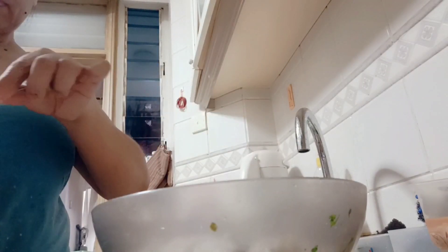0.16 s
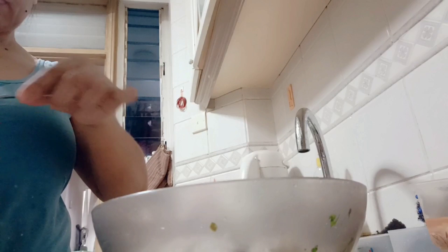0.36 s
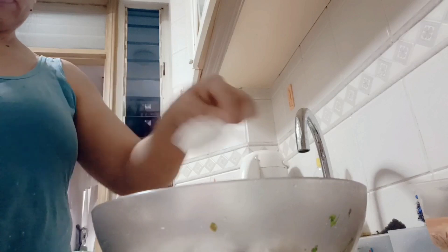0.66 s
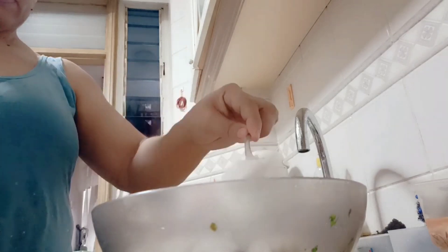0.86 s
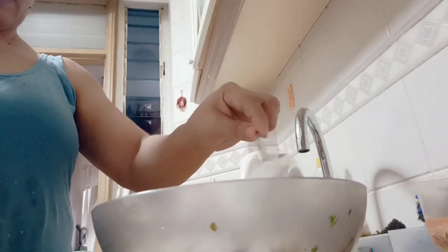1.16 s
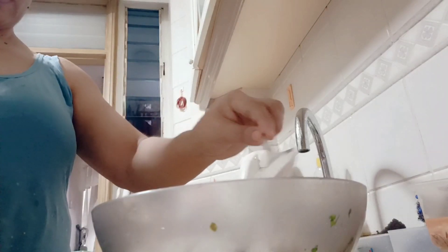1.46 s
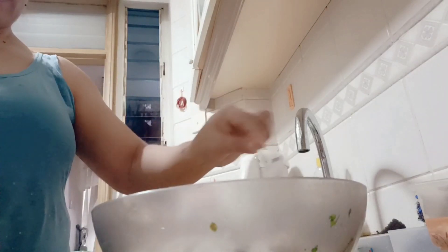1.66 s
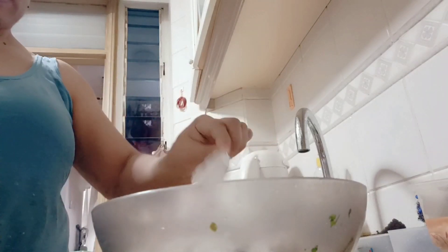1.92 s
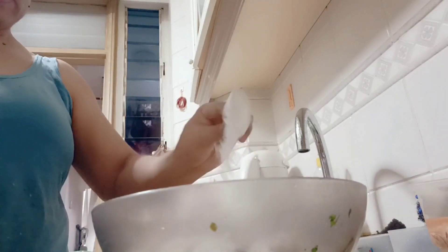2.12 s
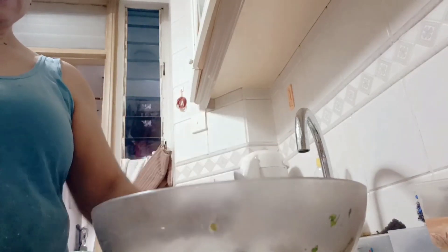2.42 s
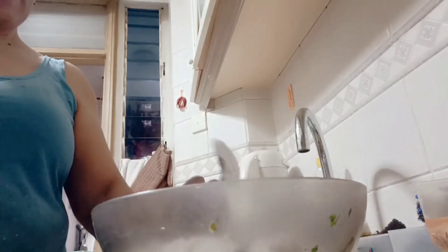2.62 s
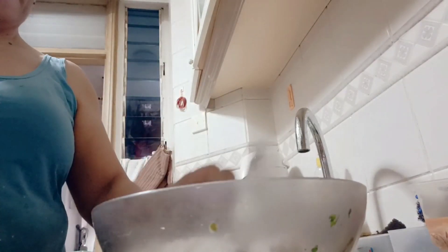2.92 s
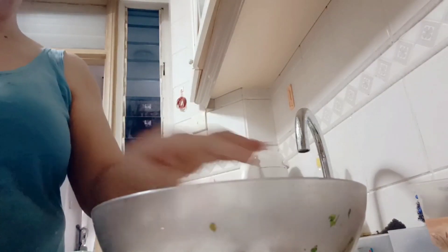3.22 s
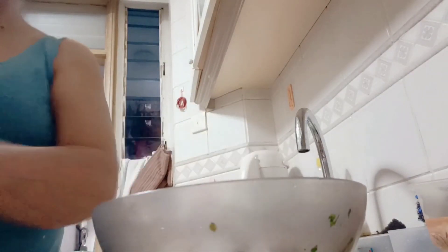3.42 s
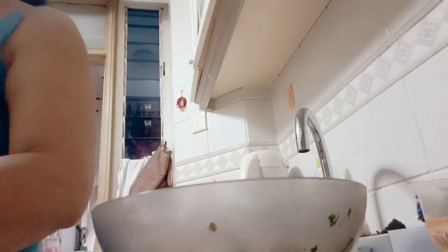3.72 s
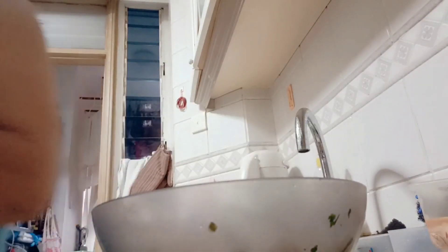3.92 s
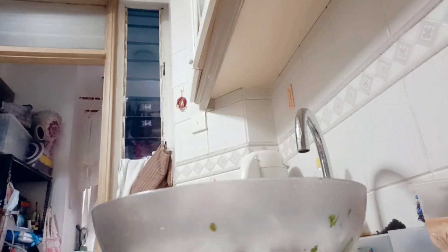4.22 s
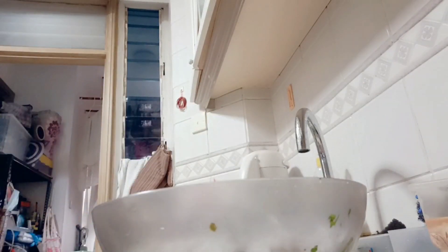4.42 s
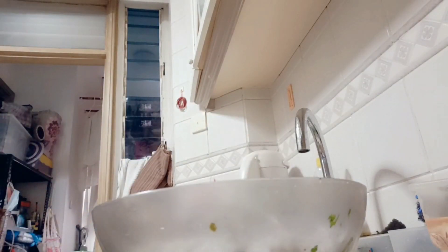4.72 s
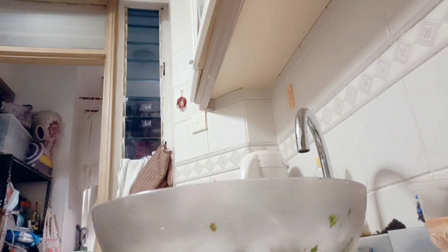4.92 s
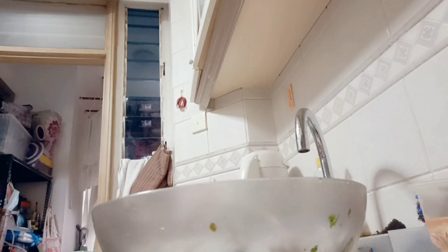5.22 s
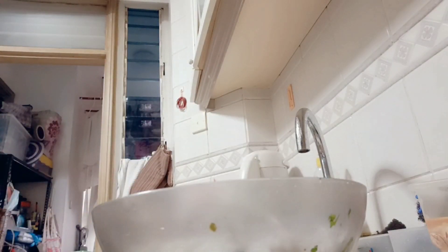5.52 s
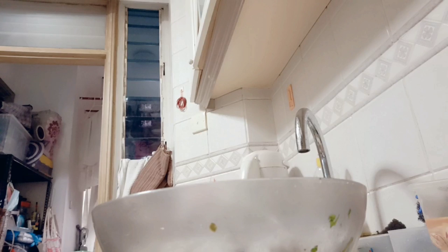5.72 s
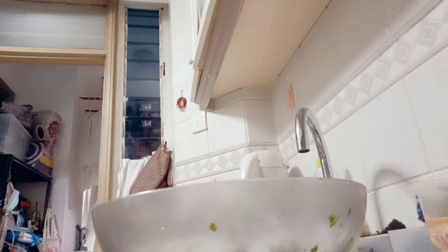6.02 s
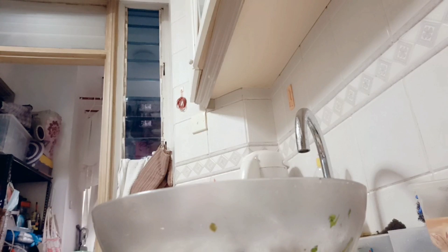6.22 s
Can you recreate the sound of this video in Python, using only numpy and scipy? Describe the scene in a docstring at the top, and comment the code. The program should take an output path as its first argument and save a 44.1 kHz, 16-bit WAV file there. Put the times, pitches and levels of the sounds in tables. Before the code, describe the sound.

In a small tiled kitchen with a faint hum, a plastic scoop knocks sharply, small snaps and bumps follow, then a metal pot clatters down.

```python
"""Two microphones in a small tiled kitchen; a quiet appliance hums under room air throughout.
After the faint dying tail of an earlier knock, a plastic scoop is knocked clean on a container and
put down. Snaps, thumps, bumps, rustles and a nudged tub follow; a metal pot is set down, rings and
rocks to rest; one soft rustle closes. Contacts are coloured pulses with scatter and reflections;
rings are sums of dying modes; rustles and air are shaped noise; the hum is wavering sines."""
import sys
import numpy as np
from scipy import signal
from scipy.fft import rfft, irfft
from scipy.io import wavfile

SR = 44100
rng = np.random.default_rng(int(sys.argv[2]) if len(sys.argv) > 2 else 0)


def materialize(psi):
    """Save the field psi as 16-bit PCM at rate SR to the path in sys.argv[1].

    A 1-D psi becomes a single channel; in a 2-D psi each row is a channel.
    """
    bounded = np.clip(np.atleast_2d(psi).T, -1, 1)
    quanta = np.round(bounded * 32767).astype(np.int16)
    wavfile.write(sys.argv[1], SR, quanta)


N = 280294  # samples
SIZE = 32768  # samples per contact buffer
AGE_S = np.arange(SIZE) / SR
FREQS_HZ = np.fft.rfftfreq(SIZE, 1 / SR)
ATTACK = 1323  # samples (30 ms)
EDGE_HZ = 15700

# Levels in the tables are relative; each source adds its own trim.
# Room air spectrum: (frequency [Hz], relative density [dB per Hz])
AIR_SPECTRUM = [(25, -13.5), (90, 1.5), (170, -12.5), (500, -11), (800, -15.5), (1300, -20), (3200, -25.5),
                (4100, -29), (5100, -37), (6400, -33), (7900, -27), (10000, -31.5), (13000, -33.5),
                (15000, -32)]
# Appliance hum before microphone gains: (frequency [Hz], mean level [dB])
HUM_TONES = [(91.5, -73.5), (242, -74), (301, -79), (355, -74.5), (710, -65), (790, -71.5), (1065, -69),
             (1421, -78.5), (1776, -79)]
# Likeness of the two microphones: (frequency [Hz], coherence [-1 to 1])
MIC_COHERENCE = [(100, 0.96), (300, 0.75), (600, 0.62), (1300, -0.41), (2500, 0.063), (15000, -0.067)]
# Tile reverberation: (frequency [Hz], t60 [s])
ROOM_DECAY = [(120, 0.42), (320, 0.25), (840, 0.23), (2000, 0.25), (3500, 0.24), (7000, 0.28),
              (14000, 0.25)]
# Sliding strokes: (start [s], swell [s], level [dB])
SLIDES = [(3.55, 0.085, -48.5), (3.69, 0.048, -58.5), (4.153, 0.019, -47.5), (4.2, 0.016, -44.5),
          (4.29, 0.095, -49.5), (4.546, 0.025, -49.5), (6.15, 0.11, -59.5)]
# Things brushed in passing; the first row is an earlier knock dying away:
# (time [s], level [dB], brightness [dB/octave], hollowness [dB], direct over scattered [dB])
BUMPS = [(0.001, -50, 4.5, -2, -12), (3.568, -43, -7, -8, -18), (3.9892, -30.5, 2.5, 6.5, 2),
         (4.002, -30.5, 1.5, 7.5, -1.5), (4.0155, -37.5, -1, -2, 0), (4.158, -48, 0.5, -9, -7)]
# Small snaps and the dull thumps that follow two of them:
# (time [s], level [dB], brightness [dB/octave], hollowness [dB], direct over scattered [dB])
SNAPS = [(3.4619, -42.5, 8, 2.5, 11), (3.616, -33.5, 3, -3, 22), (3.6197, -21.2, -3.5, 3.5, -2.5),
         (4.208, -41.5, -0.5, -24, 4), (4.2129, -33, -1.5, -6, -3.5), (5.083, -57.5, 0.8, -7, -5)]
# Hollow tub nudged: (time [s], level [dB], brightness [dB/octave])
NUDGES = [(3.9903, -25.5, 7.5), (4.003, -30, 6.5), (4.016, -16.5, -2.5), (4.108, -40, 1)]
# Pot contacts:
# (time [s], level [dB], brightness [dB/octave], hollowness [dB], base ring [dB])
POT_CONTACTS = [(5.3211, -17, 3.3, 12.5, -21.5), (5.339, -20.5, 3, -16, -36), (5.4128, -15.5, -.3, -8, -16),
                (5.434, -19, 1, -13, -35), (5.474, -19.5, 0.7, -0.5, -41), (5.5752, -12, -.7, 9, -16),
                (5.598, -37, 9, -9, -26.5), (5.633, -15.5, -3, 11, -20), (5.745, -27.5, -0.2, -2, -30.5),
                (5.779, -16, -1.6, 5.5, -29), (5.812, -30.5, -4.5, 10, -37)]
# Scoop knocks: (time [s], level [dB], brightness [dB/octave], hollowness [dB],
# direct over scattered [dB], wall stiffness [frequency ratio])
KNOCKS = [(2.3458, -14, 0.3, -5.5, -6.5, 1.066), (2.5353, -16, -1, -9, -2.5, 0.99),
          (2.6702, -15, 0, -10.5, -6.5, 1.02), (2.7126, -14.5, 5.74, 25, 2, 1.08),
          (2.8003, -19.5, -1, -6.5, -.5, 0.96), (3.0436, -19, 0.2, 0.5, -13.5, 1.05),
          (3.0915, -20, -1.5, 29, 1, 1.2), (3.1085, -22.2, 0.4, 2, -5, 1.1)]
# Bands of thud, body, clack, crack, tick: (low [Hz], high [Hz])
BANDS = [(100, 350), (350, 800), (800, 2000), (2000, 4300), (5000, 15000)]
# Ordinary blow by band: (thud [dB], body [dB], clack [dB], crack [dB], tick [dB])
BUMP_BLOW = (-14.5, -1, -1.5, -9.5, -16)
SNAP_BLOW = (-3.5, -4.5, -14.5, -13, -8)
POT_BLOW = (-7.5, 0, -2, -1.5, -20.5)
SCOOP_BLOW = (-13.5, 0, 1.5, -4.5, -22)
# Contact colour: (frequency [Hz], gain [dB])
BUMP_COLOUR = [(40, -17), (90, 1.5), (250, 3.5), (600, -9.5), (1000, -14), (2000, -8.5), (2900, 2),
               (4800, -22.5), (7500, -12), (11500, -34.5), (15000, -21)]
SNAP_COLOUR = [(40, -22), (90, -3.5), (150, -1), (230, 5.5), (330, 4.5), (480, -1.5), (680, -11.5),
               (1000, -13), (3000, -12), (5500, -12), (7400, 0), (8800, -14.5), (12000, -22.5),
               (15000, -13)]
POT_COLOUR = [(40, -35), (90, -7.5), (160, -7.5), (220, -6.5), (290, -6.5), (450, 6), (700, -1), (1600, -1),
              (2500, -14), (3800, -13.5), (5000, -30), (6500, -23.5), (9500, -25.5), (12500, -35)]
SCOOP_COLOUR = [(40, -46.5), (90, -12), (140, -5), (200, -7), (300, -2.5), (600, -10.5), (850, -3),
                (1200, -1.5), (1700, -1.5), (3100, 0.5), (3900, -9), (4700, -24), (7600, -18), (14500, -29)]
# Modes before detuning and damping: (frequency [Hz], level [dB], t60 [s])
TUB_MODES = [(489, 3.5, 0.18), (532, -8.5, 0.2), (613, -8, 0.12), (692, -7.5, 0.093), (1510, -14.5, 0.052),
             (2863, -25, 0.093)]
RIM_MODES = [(372, -5.5, 0.29), (408, -4, 0.27), (1264, 2, 0.14), (1474, -3.5, 0.12), (1535, -1.5, 0.049),
             (1860, -8, 0.32), (3290, -4.5, 0.16), (3957, -5.5, 0.11), (4200, -12.5, 0.26),
             (5905, -6.5, 0.1), (6544, -10.5, 0.142), (8170, -22, .17), (8560, -17, 0.16),
             (9300, -17.5, .13), (9900, -20, 0.22), (11060, -23, 0.35), (13860, -21.5, .2)]
BASE_MODES = [(218.6, -2, 0.21), (386.7, 4.5, 0.16), (470, 0, 0.24), (538.5, 2.5, 0.13), (570.8, 1, 0.32),
              (817, -11.5, 0.22), (1027, -6.5, 0.18), (1280, -7.5, 0.26), (1550, -19.5, 0.12),
              (1845, -2, .16), (2970, -18.5, 0.14), (3150, -10, 0.21), (3350, -16, 0.16), (4000, -12, 0.28),
              (6600, -21, 0.18), (8560, -21.5, 0.24), (10648, -31, 0.19)]
SCOOP_MODES = [(296, 0, 0.15), (582, 6, 0.081), (844, -2, 0.15), (1490, -3, 0.24), (1660, -4, .24),
               (1965, -9.5, 0.071), (2450, -6, 0.095), (2980, -2, 0.18), (3290, -27, 0.38)]

AIR_LEVEL_DB = -58.3
HUM_DRIFT_DB, HUM_LEAD_S = 2.1, 0.0002  # drift: standard deviation; lead: right mic over left
SLIDE_T60_S = 0.33
# Mid-wall blows sound hollow: centre and width of the emphasis
PLASTIC_HOLLOW_HZ, POT_HOLLOW_HZ, HOLLOW_OCTAVES = 550, 1070, 0.72
# Mode shift per contact (standard deviation, share of pitch); thin walls radiate little below this
DETUNE_RATIO, RADIATE_HZ = 0.003, 110
# Hand damps the tub: onset, added decay
GRIP_S, GRIP_T60_S = 0.063, 0.08
# Rim sings less as the pot settles flat
RIM_FIRST_DB, SETTLE_DB_PER_S = 2.5, 79
# Scoop moves left, mostly heard in the treble: limiting speed, half-effect frequency
DRIFT_DB_PER_S, SHADOW_HZ = 5, 900


def amp(db):
    """Amplitude from dB."""
    return 10 ** (np.asarray(db) / 20)


def rms(x):
    """Root mean square, kept above zero."""
    return np.sqrt(np.mean(x ** 2) + 1e-20)


def read(points, hz):
    """Straight lines between points on a log-frequency axis."""
    point_hz, value = np.transpose(points)
    return np.interp(np.log(hz + 1), np.log(point_hz + 1), value)


def fade(t, t60_s):
    """Falls by 60 dB in t60_s."""
    return np.exp(-np.log(1000) * t / np.maximum(t60_s, 1e-3))


def add(mix, start_s, sound):
    """Mix a sound in at its start, cut at the end of the mix."""
    part = mix[:, round(start_s * SR):][:, :sound.shape[1]]
    part += sound[:, :part.shape[1]]


def causal(db):
    """Minimum-phase response for a gain curve in dB."""
    cepstrum = irfft(np.log(amp(db)))
    cepstrum[1:SIZE // 2] *= 2
    cepstrum[SIZE // 2 + 1:] = 0
    return np.exp(rfft(cepstrum))


def diffuse(size):
    """Two-microphone noise spectra with the set coherence."""
    a, b = rfft(rng.standard_normal((2, size)))
    coherence = read(MIC_COHERENCE, np.fft.rfftfreq(size, 1 / SR))
    turn = np.arccos(np.clip(coherence, -1, 1)) / 2
    common, opposed = np.cos(turn) * a, np.sin(turn) * b
    return np.array([common + opposed, common - opposed])


def balance(hz, lean):
    """Gains of both microphones from points (frequency [Hz], left minus right [dB])."""
    return amp(np.array([[.5], [-.5]]) * read(lean, hz))


def grain(size, spread_db):
    """Uneven strength, redrawn about every millisecond."""
    draws = rng.standard_normal(size // 48 + 1)
    return amp(spread_db * np.repeat(draws, 48)[:size])


def overtones(count, low_hz, high_hz, width_hz, height_db):
    """Gain curve in dB of the many small, irregular resonances of a thin wall."""
    place, size = rng.random((count, 2)).T
    hz = low_hz + (high_hz - low_hz) * (np.arange(count) + place) / count
    height = amp(height_db * size)[:, None] ** 2
    peaks = height / (1 + (2 * (FREQS_HZ - hz[:, None]) / width_hz) ** 2)
    return 10 * np.log10(1 + peaks.sum(0))


def room_tail():
    """Dense tile reflections, each band dying at its own speed."""
    hz, frame_s, z = signal.stft(irfft(diffuse(SIZE)), SR, nperseg=256)
    decay = fade(frame_s, read(ROOM_DECAY, hz)[:, None])
    tail = signal.istft(z * decay, SR, nperseg=256)[1][:, :SIZE]
    tail = tail * (1 - np.exp(-AGE_S / 0.0079))
    return tail / np.linalg.norm(tail[0])


def blow(ordinary_db, hollow_hz, level_db, bright_db, hollow_db):
    """Band levels of a blow: hard contact tilts to the treble, a central one swells the middle."""
    octaves = np.log2(np.sqrt(np.prod(BANDS, axis=1)) / hollow_hz)
    hollow = np.exp(-.5 * (octaves / HOLLOW_OCTAVES) ** 2)
    db = np.array(ordinary_db) + bright_db * octaves + hollow_db * hollow
    return level_db + db - 20 * np.log10(np.linalg.norm(amp(db)))


def contact(levels_db, colour_db, direct_db, scatter_t60_s, room_db, left_lag_ms, lean):
    """One blow: a sharp pulse, the short shudder of object and counter, and the room."""
    delay_ms = np.array([[.5], [-.5]]) * left_lag_ms + .5
    pulse = np.exp(-2j * np.pi * FREQS_HZ * delay_ms / 1000)
    shudder = irfft(diffuse(SIZE)) * fade(AGE_S, scatter_t60_s)
    shudder *= grain(SIZE, spread_db=2.5) * (1 - np.exp(-AGE_S / 0.0013))
    scattered = shudder / np.linalg.norm(shudder[0]) + amp(room_db) * room_tail()
    z = amp(direct_db) * pulse + rfft(scattered)
    z = z * causal(colour_db) * balance(FREQS_HZ, lean)
    # steer each band towards its level over the attack
    plain = [rms(irfft(z * (FREQS_HZ > lo) * (FREQS_HZ < hi))[:, :ATTACK]) for lo, hi in BANDS]
    gain_db = np.array(levels_db) - 20 * np.log10(plain)
    tone = np.c_[np.sqrt(np.prod(BANDS, axis=1)), gain_db]
    return irfft(z * causal(read(tone, FREQS_HZ)))[:, :SIZE * 3 // 4]


def ring(modes, wet_db, lean):
    """Dying modes, shared a little differently by each blow; reflections make them beat."""
    hz, db, t60_s = np.transpose(modes)
    phase, luck_db, shift = rng.standard_normal((len(hz), 3)).T
    hz = hz * (1 + DETUNE_RATIO * shift)
    apart = np.arccos(np.clip(read(MIC_COHERENCE, hz), -1, 1)) / 2
    t = AGE_S[:SIZE // 2]
    angle = 2 * np.pi * phase + np.array([-apart, apart])
    weights = amp(db + luck_db) * balance(hz, lean) * np.exp(1j * angle)
    waves = np.exp(2j * np.pi * hz[:, None] * t) * fade(t, t60_s[:, None])
    dry = (weights @ waves).real * (1 - np.exp(-t / 0.00088))
    highpass = signal.butter(2, RADIATE_HZ, "highpass", fs=SR, output="sos")
    dry = signal.sosfilt(highpass, dry)
    wet = signal.fftconvolve(dry, room_tail(), axes=1)[:, :len(t)]
    return dry + amp(wet_db) * wet


def room_air():
    """Steady air noise shaped by its spectrum."""
    hz = np.fft.rfftfreq(N, 1 / SR)
    lean = [(100, 0.0), (1000, -0.5), (10000, -4.5)]
    air = irfft(diffuse(N) * amp(read(AIR_SPECTRUM, hz)) * balance(hz, lean), N)
    return amp(AIR_LEVEL_DB) * air / rms(air)


def appliance_hum():
    """Motor tones whose phase wavers and whose level swells and sinks slowly."""
    t, out = np.arange(N) / SR, np.zeros((2, N))
    waver_s, drift_s = np.linspace(0, N / SR, 70), np.linspace(0, N / SR, 10)
    mic_db, lead_s = np.array([[1.5], [3.5]]), np.array([[0], [HUM_LEAD_S]])
    for tone_hz, db in HUM_TONES:
        waver_rad = 0.57 * np.interp(t, waver_s, rng.standard_normal(70))
        drift_db = HUM_DRIFT_DB * np.interp(t, drift_s, rng.standard_normal(10))
        wave = np.sin(2 * np.pi * tone_hz * (t + lead_s) + waver_rad)
        out += amp(db + drift_db + mic_db) * wave
    return out


def stroke(t, swell_s):
    """Pressure of one slide: a smooth swell, then a steady fade."""
    swell = np.sin(np.pi / 2 * np.clip(t / swell_s, 0, 1)) ** 2
    return swell * fade(np.maximum(t - swell_s, 0), SLIDE_T60_S)


def rustle():
    """Sliding surfaces catch and slip in many tiny grains."""
    hz, t = np.fft.rfftfreq(N, 1 / SR), np.arange(N) / SR
    colour = [(40, -6), (200, 6.0), (500, 9), (1200, 3.5), (3000, 0), (5000, -9.0),
              (7800, -2), (11500, -9.5), (15000, -12)]
    lean = [(200, 2.0), (8000, -1.5)]
    hiss = irfft(diffuse(N) * amp(read(colour, hz)) * balance(hz, lean), N)
    grainy = hiss * grain(N, spread_db=1.5)
    pressure = sum(amp(db) * stroke(t - s, swell_s) for s, swell_s, db in SLIDES)
    return pressure * grainy / rms(grainy)


def bumps():
    """Earlier knock's tail, then brushed objects, on the right: coloured contacts, no modal ring."""
    out, lean = np.zeros((2, N)), [(200, -7), (1400, -1.5), (3000, -0.5), (8000, -10)]
    colour_db = read(BUMP_COLOUR, FREQS_HZ)
    for s, *touch, direct_db in BUMPS:
        levels_db = blow(BUMP_BLOW, PLASTIC_HOLLOW_HZ, *touch)
        hit = contact(levels_db, colour_db, direct_db, scatter_t60_s=0.039, room_db=-5.0,
                      left_lag_ms=0.41, lean=lean)
        add(out, s, amp(-1.3) * hit)
    return out


def snaps_and_thumps():
    """Small snaps and the dull thumps that follow two, on the right: contacts, no modal ring."""
    out, lean = np.zeros((2, N)), [(300, -3.5), (2000, -3.0), (8000, -17.0)]
    colour_db = read(SNAP_COLOUR, FREQS_HZ)
    for s, *touch, direct_db in SNAPS:
        levels_db = blow(SNAP_BLOW, PLASTIC_HOLLOW_HZ, *touch)
        hit = contact(levels_db, colour_db, direct_db, scatter_t60_s=0.04, room_db=-5.0,
                      left_lag_ms=0.46, lean=lean)
        add(out, s, amp(-3.0) * hit)
    return out


def tub():
    """Hollow tub modes, tilted by brightness and soon damped by the hand."""
    out, lean = np.zeros((2, N)), [(500, 2.3), (3000, 3.6)]
    grip = fade(np.maximum(AGE_S[:SIZE // 2] - GRIP_S, 0), GRIP_T60_S)
    lowest_hz = TUB_MODES[0][0]
    for s, level_db, bright_db in NUDGES:
        modes = [(hz, db + bright_db * np.log2(hz / lowest_hz), t60_s)
                 for hz, db, t60_s in TUB_MODES]
        add(out, s, amp(level_db - 3.0) * grip * ring(modes, wet_db=-4.5, lean=lean))
    return out


def pot():
    """The rim sings first and loses strength; the base slaps and rocks, each time on another spot."""
    out = np.zeros((2, N))
    lean = [(200, -2.5), (600, -1.0), (1300, 2.5), (3000, 0), (6000, -5), (14000, -2)]
    wall_db = overtones(count=130, low_hz=2200, high_hz=15000, width_hz=22, height_db=13)
    # pressing on the counter chokes the ring after 60 ms
    choke = fade(np.maximum(AGE_S[:SIZE // 2] - .06, 0), t60_s=0.89)
    for s, level_db, bright_db, hollow_db, base_db in POT_CONTACTS:
        levels_db = blow(POT_BLOW, POT_HOLLOW_HZ, level_db, bright_db, hollow_db)
        rim_db = level_db + RIM_FIRST_DB - SETTLE_DB_PER_S * (s - POT_CONTACTS[0][0])
        spot_db = overtones(count=30, low_hz=900, high_hz=13000, width_hz=35, height_db=10)
        colour_db = read(POT_COLOUR, FREQS_HZ) + wall_db + spot_db
        hit = contact(levels_db, colour_db, direct_db=-9.5, scatter_t60_s=0.058, room_db=-2.5,
                      left_lag_ms=0.49, lean=lean)
        add(out, s, amp(-1.5) * hit)
        add(out, s, amp(rim_db) * choke * ring(RIM_MODES, wet_db=-5.5, lean=lean))
        add(out, s, amp(base_db - 3.5) * choke * ring(BASE_MODES, wet_db=-5.5, lean=lean))
    return out


def scoop():
    """Hard, dry knocks with a brief plastic ring; each lands on another spot of the wall."""
    out = np.zeros((2, N))
    first_lean = [(200, 0.5), (600, -2.0), (1400, 3.5), (3000, -1), (6000, -4.5), (14000, -4)]
    for s, *touch, direct_db, stiffness in KNOCKS:
        levels_db = blow(SCOOP_BLOW, PLASTIC_HOLLOW_HZ, *touch)
        drift_db = DRIFT_DB_PER_S * (s - KNOCKS[0][0])
        lean = [(hz, db + drift_db * hz / (hz + SHADOW_HZ)) for hz, db in first_lean]
        spot_db = overtones(count=36, low_hz=500, high_hz=9000, width_hz=40, height_db=11)
        colour_db = read(SCOOP_COLOUR, FREQS_HZ / stiffness) + spot_db
        hit = contact(levels_db, colour_db, direct_db, scatter_t60_s=.04, room_db=-6,
                      left_lag_ms=0.086, lean=lean)
        add(out, s, amp(-2.14) * hit)
        # ring follows the clack band
        add(out, s, amp(levels_db[2] - 9.5) * ring(SCOOP_MODES, wet_db=-11, lean=lean))
    return out


def scene():
    """Sum of all sources."""
    background = room_air() + appliance_hum() + rustle()
    return background + bumps() + snaps_and_thumps() + tub() + pot() + scoop()


def record(dry):
    """Soft overload on the highest peaks, then the band limit."""
    held = dry / (1 + dry ** 8) ** (1 / 8)
    lowpass = signal.firwin(301, EDGE_HZ, window=("kaiser", 8), fs=SR)
    return signal.oaconvolve(held, lowpass[None], "same", axes=1)


dry = scene()
out = record(dry)
materialize(out)
```